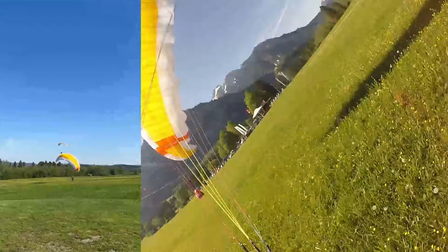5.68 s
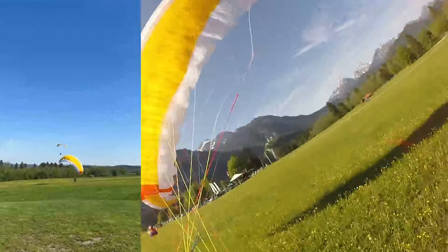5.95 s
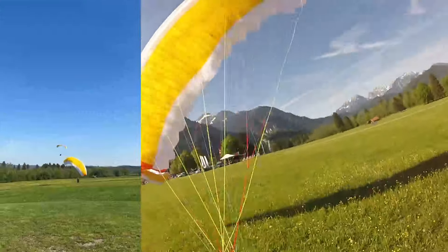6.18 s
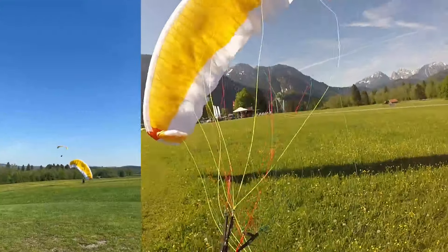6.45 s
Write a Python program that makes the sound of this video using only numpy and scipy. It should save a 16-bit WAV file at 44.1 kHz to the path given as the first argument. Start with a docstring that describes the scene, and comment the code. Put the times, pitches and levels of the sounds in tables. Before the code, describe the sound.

Hollow wind whistles and flutters over a small housed camera, fades, then a sharp knock on landing and running thumps, strap scuffs and small ticks.

```python
"""Wind hisses and flutters; steps, rubs and ticks set in, a hard blow ducks the level, and they run on with swishes.
A camera in a closed housing glides down: noise through the housing's resonances makes the wind.
As the pilot touches down on grass a buckle knocks the housing: decaying modes make it ring.
Steps, from just before the knock on, jolt the mount (swelling sines) and boom (decaying sines);
straps, lines and wing are noise bursts."""
import sys
import numpy as np
from scipy import signal
from scipy.fft import rfft, irfft, next_fast_len
from scipy.io import wavfile
from scipy.ndimage import uniform_filter1d, minimum_filter1d, map_coordinates

SR = 44100
rng = np.random.default_rng(int(sys.argv[2]) if len(sys.argv) > 2 else 0)


def volts(x):
    """Linear amplitude factor 10**(x/20) for a level x in dB, scalar or array-like."""
    e = np.asarray(x, float) / 20
    return 10 ** e


def wrap_up_sound(samples):
    """Save the sound to the file named by the first command line argument, as 16-bit audio."""
    columns = np.atleast_2d(samples).T
    # keep every value between -1 and 1, then stretch to whole-number steps
    tamed = np.clip(columns, -1, 1)
    steps = np.round(tamed * 32767).astype(np.int16)
    wavfile.write(sys.argv[1], SR, steps)


N = 289737  # length in samples

# Microphone self-noise colour. Each row: frequency in Hz, relative level in dB.
SELF_NOISE_COLOUR = [(300, -7), (3000, -0.5), (8000, 0), (11000, -4.5), (14000, -12), (15600, -15),
                     (16200, -51.5)]
# Air and grass during the run. Each row: time in seconds, air level in dB, grass swish level in dB.
GROUND_LEVELS = [(3.441, -53, -67), (3.65, -52, -66), (3.83, -59.5, -68), (4.16, -59.5, -68),
                 (4.51, -55, -62.5), (4.82, -59.5, -67.5), (5.6, -56.5, -66), (5.85, -54.5, -65),
                 (6.15, -54.5, -58.5), (6.57, -57, -57)]
# Resonances of still air and grass. Each row: frequency in Hz, width in Hz, relative level in dB.
AIR_MODES = [(1190, 290, 1), (1660, 730, -5.5), (2540, 1030, -3), (3300, 720, -7.5), (3870, 330, -5)]
# Treble resonances of wind and grass. Each row: frequency in Hz, width in Hz, relative level in dB.
TREBLE_MODES = [(4850, 880, 4), (5185, 160, 5), (5850, 1420, 1), (6720, 530, -8), (7510, 2300, -17.5),
                (9520, 1900, -20.5), (10340, 1500, -30.5), (13000, 1500, -36)]
# Low shaking of mount and housing. Each row: time in seconds, then sway, boom and murmur levels in dB.
SHAKE_LEVELS = [(0, -34, -34, -43.5), (.7, -34.5, -37.5, -44), (1.3, -41, -41.5, -48.5),
                (2.15, -42, -51.5, -55.5), (2.8, -34, -47, -54), (3.25, -21.5, -44, -49.5),
                (3.5, -31, -45, -55), (3.95, -32, -55, -61), (4.5, -27, -54, -57.5),
                (5.15, -28.5, -47, -59), (5.85, -33.5, -49, -58.5), (6.15, -29, -51, -60.5),
                (6.57, -35, -63, -63)]
# Colours of the shaking, low to high. Each row: frequency in Hz, relative level in dB.
SWAY_COLOUR = [(6, -20.5), (14, 1), (25, 1.5), (36, -5.5), (50, -4), (70, -10), (95, -21.5), (130, -58.5)]
BOOM_COLOUR = [(60, -59), (95, -7), (130, -5.5), (172, -1.5), (200, -5), (260, -22.5), (400, -70)]
MURMUR_COLOUR = [(150, -45.5), (260, -1.5), (400, -3), (600, -4), (900, -5.5), (1300, -12)]
# Footfalls swinging the mount. Each row: centre of the rock in seconds, rock level in dB, quiver level in dB,
# length at half amplitude in ms, lead of the quiver over the rock in ms.
FOOTFALLS = [(3.111, -8, -1.5, 46, 7), (3.304, -19, -3.5, 24, 0.5), (3.354, 0.5, -10, 64, -31.5),
             (3.706, -17.5, -30, 79, 3.5), (4.062, -13, -14.5, 56, 50), (4.23, -28, -22, 30, 0),
             (4.345, -15, -16, 75, 0), (4.51, -30, -24, 60, 0), (4.661, -13, -10.5, 85, -25),
             (4.85, -28, -24, 45, 0), (5.007, -11, -13, 62, -3), (5.31, -20, -22, 55, -0.5),
             (5.4, -23, -21, 40, 25), (5.719, -16, -22.5, 68, 24.5), (6.08, -11, -16.5, 43, 0.5),
             (6.155, -16, -27, 29, -3), (6.268, -18.5, -38, 63, -2), (6.477, -22.5, -24, 88, 24)]
# Strap strokes. Each row: start in seconds, end in seconds, rub level in dB, scratch over rub in dB.
RUB_STROKES = [(3.3, 3.373, -41, -7), (3.583, 3.668, -42, -4.5), (3.687, 3.738, -50, -1.5),
               (3.949, 3.993, -56, -8), (4.02, 4.073, -55, -4), (4.213, 4.234, -52, -6),
               (4.244, 4.415, -56.5, -2.5), (4.623, 4.652, -39, -9), (4.955, 5.08, -57.5, -6),
               (5.29, 5.397, -44, -6.5), (5.61, 5.695, -48.5, -0.5), (5.668, 5.791, -45.5, 2),
               (5.872, 5.96, -51.5, -7), (5.98, 6.14, -45.5, -5.5), (6.1, 6.294, -42.5, -6.5)]
# Bright nylon swishes. Each row: start in seconds, end in seconds, sizzle level in dB.
NYLON_SWISHES = [(4.635, 4.647, -57.5), (5.764, 5.874, -55)]
# Strap rub, scratch and sizzle resonances. Each row: frequency in Hz, width in Hz, relative level in dB.
STRAP_MODES = [(652, 260, -10.5), (1028, 102, -0.5), (1170, 146, -2), (1490, 160, -12)]
SCRATCH_MODES = [(1748, 130, 1.5), (2374, 380, 1.5), (3110, 430, -2), (3740, 600, -10), (4500, 690, -13.5),
                 (5520, 1400, -17)]
SIZZLE_MODES = [(5040, 990, 4), (6110, 1700, 1), (9980, 1600, -8), (13000, 1400, -15.5)]
# Ticks of lines and buckles. Each row: start in seconds, level before make-up in dB,
# body over that level in dB, brightness in dB.
CONTACT_TICKS = [(2.68, -42.5, 3, 4), (3.1494, -43, -10, 3), (3.206, -38, -9, 9), (3.211, -40, 3, 1),
                 (3.3223, -36, 5, 1), (3.3383, -28, 5.5, -0.5), (3.3435, -22, -4, -9), (3.3705, -34, -3, 0),
                 (3.4424, -45, -15, -6), (3.8274, -41, 0, 9), (3.935, -50, -3, 3), (3.9908, -46, -10, 6),
                 (4.0208, -45, -4, 3), (4.0761, -43, -27, 3), (4.1556, -43.5, 2, -4),
                 (4.2018, -40, 4.5, 10.5), (4.2816, -44, 4, 2), (4.327, -45, 4, 13), (4.384, -47, 10.5, 2),
                 (4.586, -36.5, -1, -1), (4.619, -52, 16, -8), (4.6318, -35.5, -3, 7),
                 (4.6862, -42.5, -6, -14), (4.7439, -38.5, -11, 2), (4.9694, -47, 7, 0),
                 (5.0828, -46.5, -1, -14), (5.2984, -37, 8.5, -13), (5.5064, -48, 0, -7),
                 (5.6423, -22.5, -18, 4.5), (5.7996, -40, 0, 3), (5.8374, -46, -14, 15),
                 (5.886, -46.5, 16.5, -3)]
# Body, bite, treble and edge of a small contact, one list each.
# Each row: frequency in Hz, width in Hz, relative level in dB.
CONTACT_MODES = [
    [(780, 710, -2), (1250, 460, -0.5), (1747, 740, 0.5)],
    [(2510, 570, -2), (3030, 650, -2.5), (3760, 480, -1)],
    [(5240, 1200, 2), (6270, 890, -3), (7360, 1100, -4)],
    [(9700, 1500, -1.5), (11000, 1500, -2.5), (13000, 2000, -9)],
]
# Steps ringing the housing. Each row: start in seconds, level before make-up in dB, boom frequency in Hz,
# slap over boom in dB.
STEP_THUMPS = [(3.1, -34, 168, -10), (3.256, -25, 168, -34), (3.325, -32.5, 168, -17),
               (3.495, -36, 165, -30), (3.615, -35.5, 140, -9), (3.888, -28, 170, -23),
               (3.94, -36, 168, -20), (4.216, -34, 160, -20.5), (4.303, -38, 168, -9),
               (4.618, -24.5, 140, -10), (4.963, -27, 140, -17), (5.14, -38, 168, -29),
               (5.297, -17.5, 168, -20.5), (5.36, -31, 160, -25), (5.642, -33.5, 168, -14),
               (5.71, -27, 170, -22), (5.887, -36, 175, -35), (6.076, -36.5, 168, -18)]
# Airflow in flight. Each row: time in seconds, hiss level in dB, treble level in dB.
FLIGHT_LEVELS = [(0, -29, -51), (.3, -29, -51.5), (.61, -26.5, -45.5), (1.0, -30, -52.5),
                 (1.55, -36.5, -61), (1.76, -44.5, -64), (2.1, -50.5, -71), (2.19, -44, -70),
                 (2.5, -45.5, -68.5), (2.78, -45.5, -61.5), (2.93, -42, -59.5), (3.07, -47, -63),
                 (3.42, -49.5, -62)]
# Wind resonances of the housing. Each row: frequency in Hz, width in Hz, relative level in dB.
HOUSING_MODES = [(1066, 217, -8), (1184, 118, -4.5), (1283, 111, -1), (1640, 470, -7.5), (2255, 330, -14),
                 (2644, 246, -5), (2862, 380, -10.5), (3400, 590, -19.5), (3845, 355, -14.5)]
# The hard blow. One row: start in seconds, peak in dB.
HARD_KNOCK = (3.4176, 18.1)
# Modes of the struck housing. Each row: frequency in Hz, relative level in dB, t60 in seconds.
SHELL_MODES = [(91, -12, .04), (170, -5, 0.014), (283, -10.5, 0.014), (420, -11, 0.009), (630, -16, 0.013),
               (930, -11, 0.0064), (1250, -29.5, 0.013), (1657, 1, 0.01), (2023, -7.5, 0.018),
               (2190, -18, .04), (2510, -1, 0.021), (2980, -16.5, 0.013), (3095, -12.5, 0.015),
               (3536, -5.5, 0.01), (4560, -31, 0.028), (5220, -24.5, 0.015), (5930, -3, 0.0047),
               (7450, -22.5, 0.0051), (9020, -22, 0.007), (10500, -24, 0.0074)]

ROCK_HZ, QUIVER_HZ, SWING_SPREAD = 20.3, 49.6, 0.064  # centre pitches; largest random detune as a ratio
RATTLE_DB, RATTLE_S = -33, 0.073  # boom stirred by a footfall: level under its rock, fade to 1/e each way
SWISH_SCRATCH_DB = -2  # scratch over the sizzle of a swish
TICK_S = 0.011  # t60
TREBLE_DB, EDGE_DB, TREBLE_FOLLOWS = -8.5, -24, 0.49  # shares at brightness 0; treble dB per dB of brightness
FAINT_COUNT, FAINT_DB, FAINT_SPREAD_DB = 10, -56, 2  # faint ticks; level before make-up
THUMP_S = 0.068  # t60 of the boom
THUD_HZ, THUD_DB, THUD_S = 95, -5, 0.035  # dull push: pitch, level over boom, t60


def unit(x):
    """Scales to rms 1."""
    return x / np.sqrt(np.mean(x ** 2) + 1e-20)


def curves(rows):
    """Draws one fader curve for each column after the time."""
    s, *columns = np.transpose(rows)
    return [np.interp(np.arange(N) / SR, s, column) for column in columns]


def wobble(rate):
    """Draws a smooth random curve with rate knots a second."""
    knots = rng.standard_normal(int(N * rate / SR) + 4)
    return map_coordinates(knots, [np.arange(N) * rate / SR])


def sloped(points):
    """Gain over frequency from (Hz, dB) points on a log axis."""
    f, db = np.transpose(points)
    return lambda hz: volts(np.interp(np.log(hz + 1), np.log(f + 1), db, left=-120, right=-120))


def humped(modes):
    """Gain over frequency from steep-sided resonances that add in power."""
    return lambda hz: np.sqrt(sum(volts(db) ** 2 / (1 + (2 * (hz - c) / w) ** 2) ** 2 for c, w, db in modes))


def rush(gain, patchy_db):
    """Coloured noise of rms 1 with patches of random gain in time and frequency."""
    hz, _, z = signal.stft(rng.standard_normal(N + 512), SR, nperseg=512)
    patches = uniform_filter1d(rng.standard_normal(z.shape), 5, 0)
    patches = unit(uniform_filter1d(patches, 8, 1))
    patchy = signal.istft(z * volts(patchy_db * patches), nperseg=512)[1][:N]
    size = next_fast_len(N + 8192)
    spectrum = rfft(patchy, size) * gain(np.fft.rfftfreq(size, 1 / SR))
    return unit(irfft(spectrum, size)[:N])


def add(out, s, x):
    """Mixes x into out from time s on."""
    part = out[max(round(s * SR), 0):][:len(x)]
    part += x[:len(part)]


def microphone_hiss():
    """The microphone's own noise: a steady bed of coloured hiss."""
    return volts(-72) * rush(sloped(SELF_NOISE_COLOUR), patchy_db=1.5)


def breeze():
    """Weak, even noise of air and grass during the run, each wavering slightly by itself."""
    air_db, swish_db = curves(GROUND_LEVELS)
    landed = np.arange(N) / SR > GROUND_LEVELS[0][0]
    air = volts(air_db + 0.52 * wobble(30)) * rush(humped(AIR_MODES), patchy_db=1.3)
    swish = volts(swish_db + 0.64 * wobble(30)) * rush(humped(TREBLE_MODES), patchy_db=1.2)
    return landed * (air + swish)


def shaking():
    """Air and body shake the housing in lumps of low noise; footfalls stir the boom."""
    _, boom_db, murmur_db = curves(SHAKE_LEVELS)
    boom_level = volts(boom_db)
    late = np.arange(-SR // 4, SR // 4) / SR  # seconds from the footfall's centre
    for s, rock_db, *_ in FOOTFALLS:
        add(boom_level, s + late[0], volts(rock_db + RATTLE_DB) * np.exp(-(late / RATTLE_S) ** 2))
    boom = boom_level * unit(volts(1.46 * wobble(10)) * rush(sloped(BOOM_COLOUR), patchy_db=1.5))
    murmur = volts(murmur_db) * unit(volts(1.76 * wobble(15)) * rush(sloped(MURMUR_COLOUR), patchy_db=0.0))
    return boom + murmur


def mount():
    """The soft mount sways as low noise; each footfall swings it in two ways, swelling and fading."""
    sway_db = curves(SHAKE_LEVELS)[0]
    out = volts(sway_db) * unit(volts(1.1 * wobble(5.7)) * rush(sloped(SWAY_COLOUR), patchy_db=-0.5))
    late = np.arange(-SR // 8, SR // 8) / SR  # seconds from the swing's centre
    chances = rng.random((len(FOOTFALLS), 4))
    for (s, rock_db, quiver_db, ms, lead_ms), chance in zip(FOOTFALLS, chances):
        swell = 0.5 ** ((2000 * late / ms) ** 2)
        rock = (s, rock_db, ROCK_HZ, *chance[:2])
        quiver = (s - lead_ms / 1000, quiver_db, QUIVER_HZ, *chance[2:])
        for at, db, hz, turn, off in (rock, quiver):
            detuned_hz = hz * (1 + SWING_SPREAD * (2 * off - 1))
            cycles = detuned_hz * late * (1 - 1.37 * late)  # the swing slows as it goes
            add(out, at + late[0], volts(db) * swell * np.cos(2 * np.pi * (cycles + turn)))
    return 0.92 * np.tanh(out / 0.92)  # it stiffens at the end of its travel


def stroke(start, end):
    """Loudness of one drag: a rounded swell from start to end."""
    return np.sin(np.linspace(0, np.pi, round((end - start) * SR))) ** 0.65


def rubbing():
    """Straps drag over the shell in scuffing strokes; nylon scratches and sizzles above them."""
    levels = np.zeros((3, N))
    rub, scratch, sizzle = levels
    for start, end, db, scratch_db in RUB_STROKES:
        add(rub, start, volts(db) * stroke(start, end))
        add(scratch, start, volts(db + scratch_db) * stroke(start, end))
    for start, end, db in NYLON_SWISHES:
        add(scratch, start, volts(db + SWISH_SCRATCH_DB) * stroke(start, end))
        add(sizzle, start, volts(db) * stroke(start, end))
    scuff = volts(1.2 * wobble(45) + 1.8 * wobble(200))
    colours = (STRAP_MODES, SCRATCH_MODES, SIZZLE_MODES)
    return scuff * sum(level * rush(humped(modes), patchy_db=1.4) for level, modes in zip(levels, colours))


def ticks():
    """Lines and buckles touch in short gritty bursts, brighter ones with more treble and edge."""
    levels, t = np.zeros((4, N)), np.arange(SR // 20) / SR
    # faint ticks fall at random during the run
    run_start = GROUND_LEVELS[0][0]
    times = rng.random((FAINT_COUNT, 1)) * (N / SR - run_start) + run_start
    spread = [FAINT_SPREAD_DB, 5, 5] * rng.standard_normal((FAINT_COUNT, 3))
    faint = np.hstack([times, [FAINT_DB, -3, 0] + spread])
    burst = volts(8 - 60 * t / TICK_S) * (1 - np.exp(-t / (0.12 * TICK_S)))  # 8 dB make-up for the soft onset
    for s, db, body_db, bright_db in [*CONTACT_TICKS, *faint]:
        shares_db = (body_db, 0, TREBLE_DB + TREBLE_FOLLOWS * bright_db, EDGE_DB + bright_db)
        for level, share_db in zip(levels, shares_db):
            add(level, s, volts(db + share_db) * burst)
    grits = [rush(humped(modes), patchy_db=-3.5) for modes in CONTACT_MODES]
    # levelled over about 3 ms, so that no tick falls into a lull of the noise
    firm = [g / np.sqrt(np.abs(uniform_filter1d(g * g, 130)) + 0.05) for g in grits]
    return sum(level * g for level, g in zip(levels, firm))


def steps():
    """Each step pushes the housing, rings its boom and slaps its wall: three decaying sines."""
    out, t = np.zeros(N), np.arange(SR // 4) / SR
    thud = volts(THUD_DB - 60 * t / THUD_S) * np.sin(2 * np.pi * THUD_HZ * t)
    onset = 1 - np.exp(-t / 0.003)
    spreads = rng.standard_normal((len(STEP_THUMPS), 1))
    for (s, db, hz, slap_db), spread in zip(STEP_THUMPS, spreads):
        boom = volts(-60 * t / THUMP_S) * np.sin(2 * np.pi * hz * t)
        slap_hz = 325 * (1 + 0.06 * spread)
        slap = volts(slap_db - 60 * t / (1.02 * THUMP_S)) * np.sin(2 * np.pi * slap_hz * t)
        add(out, s, volts(db + 10.5) * onset * (thud + boom + slap))  # 10.5 dB make-up
    return out


def wind():
    """Turbulence at the port flutters; hiss and treble share the flutter, the highest treble spits."""
    hiss_db, treble_db = curves(FLIGHT_LEVELS)
    flying = np.arange(N) / SR < FLIGHT_LEVELS[-1][0]
    flutter = 0.57 * wobble(13) + 0.44 * wobble(60)  # dB
    hiss = volts(hiss_db + flutter) * rush(humped(HOUSING_MODES), patchy_db=0.5)
    treble = volts(treble_db + flutter + 0.42 * wobble(25)) * rush(humped(TREBLE_MODES[:5]), patchy_db=-0.9)
    spit = volts(treble_db - 23.5 + 3.5 * wobble(45)) * rush(humped(TREBLE_MODES[4:]), patchy_db=3.5)
    return flying * (hiss + treble + spit)


def knock():
    """One hard blow rings all modes of the shell inward at once, with a short noisy crack."""
    out, t = np.zeros(N), np.arange(SR // 8) / SR
    start, peak_db = HARD_KNOCK
    ring = sum(volts(db - 60 * t / t60) * np.sin(2 * np.pi * hz * t) for hz, db, t60 in SHELL_MODES)
    crack = volts(-24 - 60 * t / 0.0066) * rng.standard_normal(len(t))
    blow = (1 - np.exp(-t / 0.0002)) * (crack - ring)  # minus: the shell first moves inward
    add(out, start, volts(peak_db) * blow / np.abs(blow).max())
    return out


def scene():
    """All sources at the single microphone, over its own hiss."""
    background = microphone_hiss() + breeze() + shaking() + mount()
    contacts = rubbing() + ticks() + steps()
    return (background + contacts + wind() + knock())[None]


def gain_control(x, top, ahead_s, attack_s, release_db):
    """Looks ahead, ducks fast under an overload and climbs back at release_db a second."""
    need_db = np.minimum(0, 20 * np.log10(top / (np.abs(x) + 1e-9)))
    ahead = round(ahead_s * SR)
    need_db = minimum_filter1d(need_db, ahead, origin=-(ahead // 2))
    climb = release_db * np.arange(N) / SR
    gain = volts(np.minimum.accumulate(need_db - climb) + climb)
    pole = np.exp(-1 / (attack_s * SR))
    smooth_change = signal.lfilter([1 - pole], [1, -pole], gain - 1)
    return x * (1 + smooth_change)


def top_cut(x):
    """Nothing passes above the cut-off."""
    return signal.sosfilt(signal.butter(12, 16290, fs=SR, output="sos"), x)


def record(dry):
    """Gain control ducks overloads, peaks clip just above full scale, and a low-pass softens the top."""
    ducked = gain_control(dry[0], top=1.2, ahead_s=0.0112, attack_s=0.0008, release_db=30)
    clipped = np.clip(ducked, -1.05, 1.05)
    low_pass = signal.butter(6, 14000, fs=SR, output="sos")
    mix = signal.sosfilt(low_pass, clipped)[None]
    return top_cut(mix)


dry = scene()
out = record(dry)
wrap_up_sound(out)
```